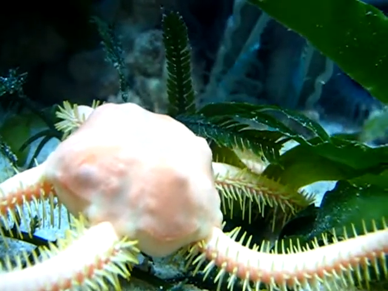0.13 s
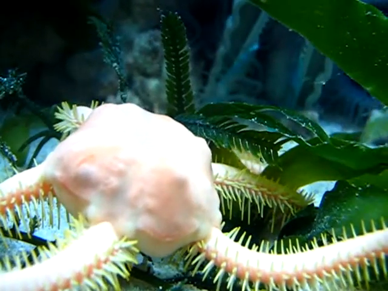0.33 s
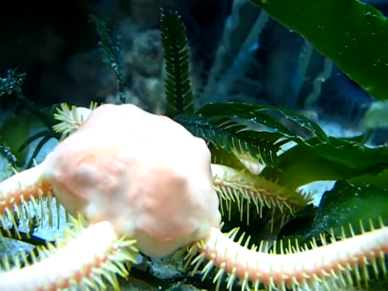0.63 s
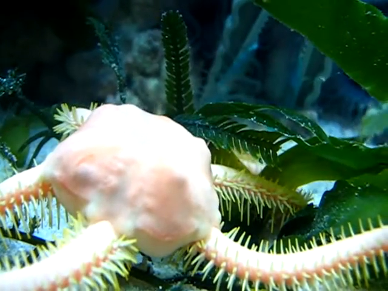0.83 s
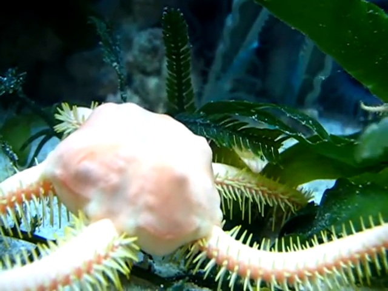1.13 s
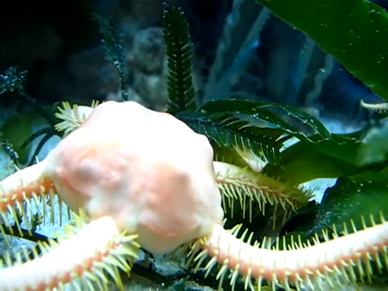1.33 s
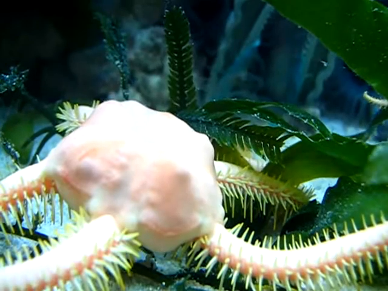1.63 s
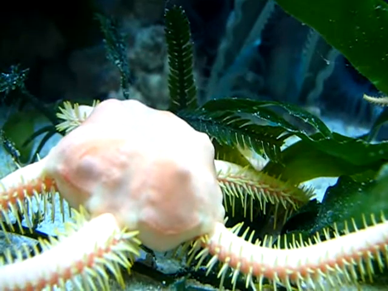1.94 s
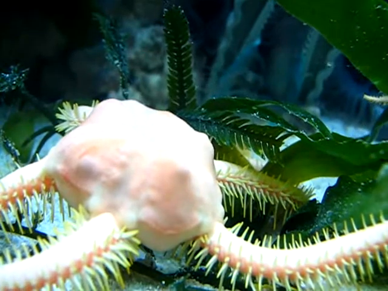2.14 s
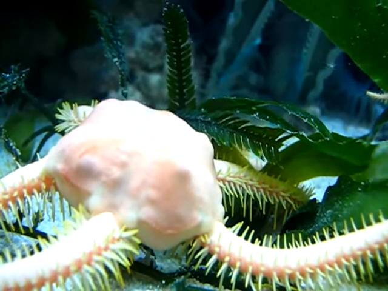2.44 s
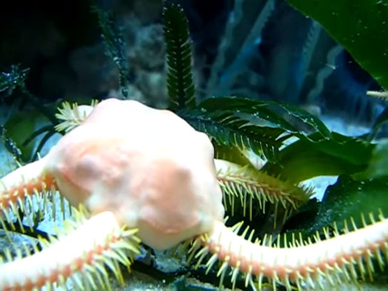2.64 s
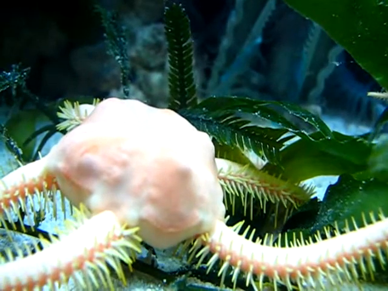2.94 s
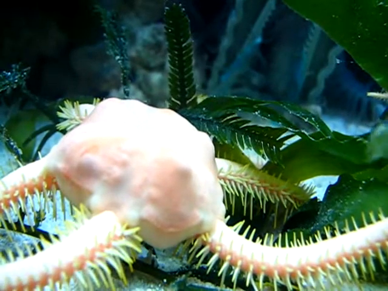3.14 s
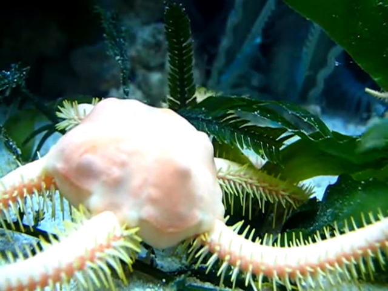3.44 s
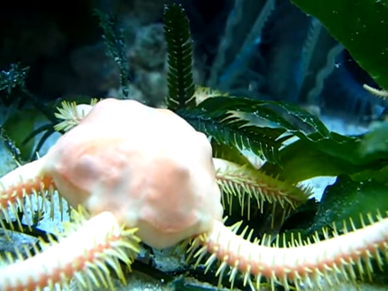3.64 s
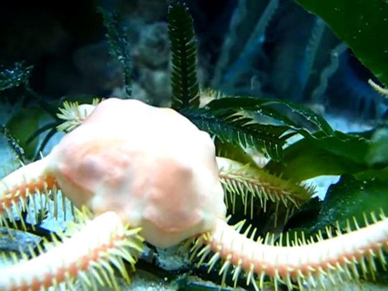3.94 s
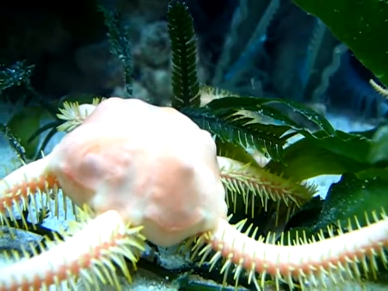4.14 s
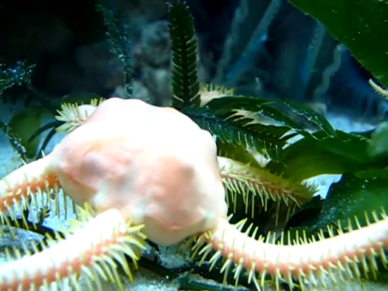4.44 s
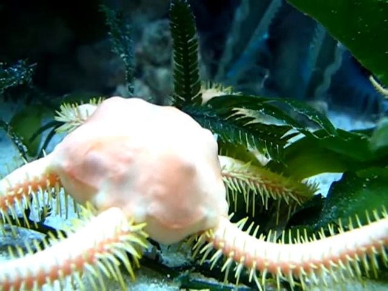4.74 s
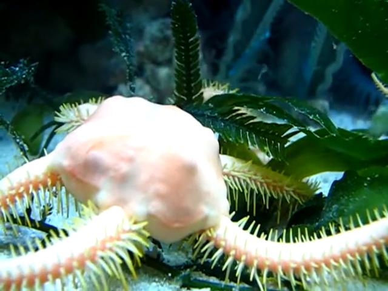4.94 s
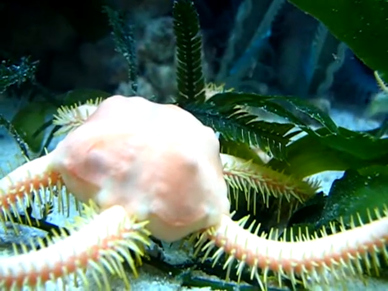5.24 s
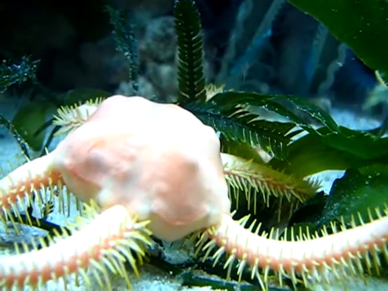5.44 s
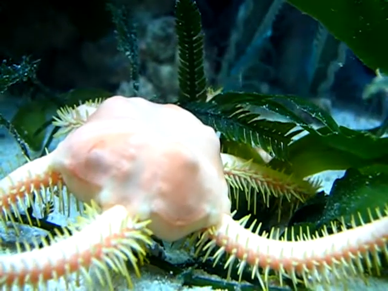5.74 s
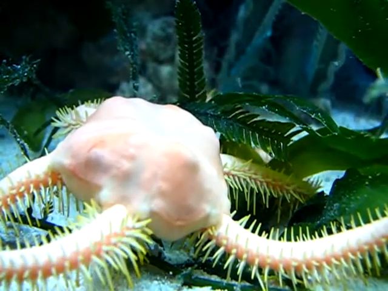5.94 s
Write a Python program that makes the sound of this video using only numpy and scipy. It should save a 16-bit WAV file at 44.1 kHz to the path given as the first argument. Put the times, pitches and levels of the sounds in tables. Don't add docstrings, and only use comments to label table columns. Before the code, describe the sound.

A steady low pump hum with a strong tone around 200 Hz fills a small indoor room beside an aquarium. Soft water rush and early gurgles lie beneath thin, constant high whines. A click with a thump comes near one second, small bubble pops and splashes follow, then handling bumps cluster after four seconds. A split-second buzz ends it in silence. Close compact stereo microphone, bumps mostly left.

```python
import sys
import numpy as np
from scipy import signal
from scipy.fft import rfft, irfft, next_fast_len
from scipy.io import wavfile
from scipy.ndimage import uniform_filter1d

SR = 44100
rng = np.random.default_rng(int(sys.argv[2]) if len(sys.argv) > 2 else 0)


def elevation(decibels):
    levels = np.asarray(decibels, float)
    return 10 ** (levels / 20)


def wav_out(sig):
    wavfile.write(sys.argv[1], SR, np.round(np.clip(np.atleast_2d(sig).T, -1, 1) * 32767).astype(np.int16))


N = 268112
T = np.arange(N) / SR


def unit(x):
    return x / np.sqrt(np.mean(x ** 2))


def gains(left_db, right_db, change_db=0):
    return elevation(np.array([[left_db], [right_db]]) + change_db)


def curve(table):
    s, *columns = np.transpose(table)
    return [np.interp(T, s, c) for c in columns]


def walk(rate_hz):
    hold = int(SR / rate_hz)
    steps = np.repeat(rng.standard_normal(N // hold + 1), hold)
    return 1.3 * uniform_filter1d(uniform_filter1d(steps, hold), hold)[:N]


def bell(s, half_s):
    return np.exp(-((T - s) / half_s) ** 2)


def band(hz, width_hz, size=N):
    b, a = signal.iirpeak(hz, hz / width_hz, fs=SR)
    once = signal.lfilter(b, a, rng.standard_normal(size))
    return unit(signal.lfilter(b, a, once))


def ring(hz, t60_ms, glide=0., rise_ms=.3):
    ms = np.arange(int(t60_ms * SR / 1000)) * 1000 / SR
    phase = 2 * np.pi * hz * (ms + 2 * glide * ms ** 2 / t60_ms) / 1000
    shape = 1000 ** (-ms / t60_ms) * (1 - np.exp(-ms / rise_ms))
    return np.sin(phase) * shape / shape.max()


def add(out, s, x, left_db, right_db):
    i = int(s * SR)
    out[:, i:i + len(x)] += gains(left_db, right_db) * x[:N - i]


# multiple of mains (rounded in use), left level in dB, right level in dB.
HUM_LINES = [(0.992, -41, -42.5), (1.997, -41.5, -48.5), (2.99, -50, -50.5), (4, -27, -29),
             (5.01, -37, -40), (6.05, -52.5, -54.5), (6.94, -56.5, -60.5), (8.04, -55, -56.5),
             (10.06, -55.5, -63), (11.06, -60, -66), (18.05, -66, -62), (27.02, -63, -72),
             (28.16, -65, -71), (39, -87, -76.5), (43, -76, -71), (45, -81, -89), (61.4, -68.5, -80),
             (68, -79, -71.5)]
# frequency in Hz, left level in dB, right level in dB.
RATTLE_SPECTRUM = [(600, -77.5, -88), (2000, -75.5, -86.5), (3480, -76.5, -89), (5000, -84.5, -88.5),
                   (7500, -82, -73.5), (8530, -93, -93)]


def pumps():
    mains_hz, start_rad, step_rad = 50.003, -2.1, 4.15
    cabinet_lead_rad, second_lag_rad = 1.45, 0.21
    turn = 2 * np.pi * mains_hz * T + step_rad
    out = np.zeros((2, N))
    for multiple, left_db, right_db in HUM_LINES:
        k = round(multiple)
        lead = cabinet_lead_rad * np.clip(3 - 2 * abs(k - 4.75), 0, 1) * (k > 3)
        lag = np.array([[0], [second_lag_rad * (k == 2)]])
        out += gains(left_db, right_db, 0.21 * walk(3.4)) * np.cos(k * turn + start_rad + lead - lag)

    hz, left_db, right_db = np.transpose(RATTLE_SPECTRUM)
    cycle = np.linspace(0, 2 * np.pi, num=2048, endpoint=False)
    orders = np.arange(12, 170)[:, None]
    scatter_db = 4.0 * rng.standard_normal(orders.shape)
    phase = rng.uniform(0, 2 * np.pi, orders.shape)
    for side, db in enumerate((left_db, right_db)):
        level = elevation(np.interp(orders * mains_hz, hz, db) + scatter_db)
        shape = (level * np.cos(orders * cycle + phase)).sum(axis=0)
        out[side] += np.interp(turn, cycle, shape, period=2 * np.pi)
    return np.sqrt(2) * out


# frequency in Hz, left and right density in dB per Hz, likeness 0-1.
RUSH_SPECTRUM = [(20, -83.5, -86.5, .5), (45, -65, -69, .8), (75, -68, -81.5, .6), (125, -63.5, -68.5, 1),
                 (230, -61.5, -63, 0.94), (278.8, -70, -75, 1), (456, -75.5, -77, 0.7),
                 (684, -75, -74, 0.3), (1040, -78.5, -81, 0.7), (1240, -85.5, -83.5, 0.6),
                 (2000, -85, -86.5, 0.22), (4000, -86, -88, 0.05), (5450, -89, -88.5, .05),
                 (7000, -87.5, -90, 0), (8950, -90.5, -89.5, 0.27), (10900, -94.5, -96.5, 0.02)]
# frequency in Hz, width in Hz, left and right density in dB per Hz.
RESONANCES = [(156.8, 34, -62.5, -60), (203.4, 26.6, -55, -57), (346, 35, -67.5, -73),
              (610, 60, -71, -78.5), (781, 15, -66.5, -71), (819, 32, -69, -73), (1434, 220, -81, -85),
              (4293, 370, -86, -97.5), (7860, 1200, -90, -81)]
# centre in seconds, level above calm in dB.
FLOW_SURGES = [(0, 4.5), (.33, 6), (.49, 8.5), (.84, 3), (1.1, 2.5), (2.3, 2), (2.73, 4), (4.17, 4.5),
               (4.33, 4), (4.52, 4), (4.7, 10.5), (4.86, 4), (5.19, 13)]


def water():
    size = next_fast_len(N)
    f = np.maximum(np.arange(size // 2 + 1) * SR / size, 1)
    hz, left_db, right_db, like = np.transpose(RUSH_SPECTRUM)
    power = np.array([elevation(np.interp(np.log(f), np.log(hz), db)) ** 2 for db in (left_db, right_db)])
    for centre_hz, width_hz, l_db, r_db in RESONANCES:
        power += gains(l_db, r_db) ** 2 / (1 + (2 * (f - centre_hz) / width_hz) ** 2) ** 2
    like = np.clip(np.interp(np.log(f), np.log(hz), like), 0, 1)
    mid, side = rfft(rng.standard_normal((2, size)))
    both = mid * np.sqrt(1 + like) + side * np.sqrt(1 - like) * np.array([[1], [-1]])
    both = both * np.sqrt(power * SR / 4)

    surge_s, calm_db, middle_share = .05, -2.5, 0.13
    boom_db = sum(db * bell(s, surge_s) for s, db in FLOW_SURGES) + calm_db
    middle_db = middle_share * boom_db + 2 * bell(4.6, 0.69)
    place = np.clip(2 * np.log2(f / 20), 0, 19)
    swell, out = walk(2), 0
    for k in range(20):
        own_db = boom_db * (k == 6) + middle_db * (9 <= k <= 11)
        share = np.clip(1 - abs(place - k), 0, 1)
        flicker_db = .3 * swell + .5 * walk(2.5) + .8 * walk(15)
        out = out + irfft(both * share, size)[:, :N] * elevation(own_db + flicker_db)
    return out


# centre in seconds, peak in dB, half length in seconds.
GULPS = [(.015, -48, .03), (.11, -52, .05), (.23, -47, .04), (.29, -51, .03), (.39, -54, .03),
         (.47, -45, .045), (.58, -50, .025)]
# start in seconds, peak in dB, frequency in Hz, width in Hz.
SPLASH_EVENTS = [
    (1.17, -58, 6500, 2000),
    (1.62, -55.5, 6030, 2000),
    (2.14, -55, 6200, 1500),
    (3.15, -51, 2960, 2500),
    (3.22, -52, 6500, 2000),
    (3.58, -50, 1750, 400),
    (4.71, -58, 4000, 300),
]
# start in seconds, peak in dB, frequency in Hz, t60 in ms, left minus right in dB.
BUBBLE_POPS = [(1.9815, -39, 2620, 22, 3), (1.9895, -46, 2500, 12, 3), (2.2543, -46.5, 2620, 14, 2),
               (2.3301, -49, 2600, 14, 2), (2.6694, -48, 2600, 12, 2), (3.038, -47, 3300, 12, 4),
               (2.905, -44, 880, 26, 14), (4.683, -47, 3800, 80, 4), (4.692, -48, 4150, 30, 4)]


def surface():
    shared = band(1560, 450)
    bright = elevation(-5 - 14 * np.minimum(T, 1))
    gate = sum(elevation(db) * bell(s, half_s) for s, db, half_s in GULPS)
    sides = []
    for side_db in (1.5, -1):
        body = .8 * shared + .6 * band(1560, 450)
        treble = band(3300, 500) + .7 * band(2500, 900)
        sides.append(gate * (body + bright * treble) * elevation(side_db))
    out = np.array(sides)

    rise_ms, splash_t60_ms, glide_per_ms = 13, 160, .0015
    ms = np.arange(int(splash_t60_ms * SR / 1000)) * 1000 / SR
    shape = (1 - np.exp(-(ms / rise_ms) ** 2)) * 1000 ** (-ms / splash_t60_ms)
    for s, db, hz, width_hz in SPLASH_EVENTS:
        splash = band(hz, width_hz, size=len(ms)) * shape / shape.max()
        add(out, s, splash, db + 2.5, db - 3.5)
    for s, db, hz, t60_ms, pan_db in BUBBLE_POPS:
        bubble = ring(hz, t60_ms, glide_per_ms * t60_ms, rise_ms=1)
        add(out, s, bubble, db + pan_db / 2, db - pan_db / 2)
    return out


# time in seconds, 7th multiple in Hz, level in dB.
MOTOR_SPEED = [
    (0.0, 4240, -64),
    (0.12, 4249, -65),
    (0.62, 4252, -64.5),
    (0.83, 4253, -58.5),
    (3.02, 4260, -60),
    (5.45, 4263, -59),
]
# shaft multiple, left level in dB, right level in dB.
MOTOR_PARTIALS = [(4, -10.5, -10), (7, 4.5, -7), (8, -16, -6.5), (10, -16, -24.5), (11, -13, -22),
                  (12, -4, 2), (15, -10, -14)]


def motor():
    hz, db = curve(MOTOR_SPEED)
    turn = 2 * np.pi * np.cumsum(hz / 7 * (1 + .0003 * walk(12))) / SR
    out = 0
    for k, left_db, right_db in MOTOR_PARTIALS:
        out = out + gains(left_db, right_db, db + .6 * walk(14)) * np.cos(round(k) * turn)
    return np.sqrt(2) * out


# start in seconds, peak in dB.
SHELL_TICKS = [(1.2206, -33), (1.9895, -37.5), (2.2555, -41), (2.334, -46), (2.6694, -45), (4.336, -38),
               (4.6988, -34.5)]
# frequency in Hz, level in dB, t60 in ms.
SHELL_MODES = [(600, -2, 7), (1100, -2, 6), (1800, -6, 4), (2700, -1, 6), (3200, 0, 6), (3700, -4, 6)]
# start in seconds, peak in dB, frequency in Hz, t60 in ms.
THUMPS = [
    (.895, -38, 50.1, 80),
    (1.215, -25, 95, 36),
    (3.496, -31, 75, 74),
    (4.338, -27.5, 105, 56),
    (4.417, -27.5, 110, 50),
    (4.475, -28.5, 80, 90),
    (4.695, -23, 90, 45),
    (4.945, -32, 65, 70),
]


def fingers():
    out = np.zeros((2, N))
    for s, db in SHELL_TICKS:
        add(out, s, ring(1200, 2.5, rise_ms=.1), db, db - 11)
        for hz, mode_db, t60_ms in SHELL_MODES:
            add(out, s, ring(hz, t60_ms, rise_ms=.35), db + mode_db, db + mode_db - 11)
    for s, db, hz, t60_ms in THUMPS:
        add(out, s, ring(hz, t60_ms, rise_ms=3.4), db + 2, db - 18)
    return signal.sosfilt(signal.butter(2, 45, "high", fs=SR, output="sos"), out)


# frequency in Hz, left level in dB, right level in dB, flip in ms, right lag in rad.
READOUT_WHINES = [(7867.14, -52.5, -51, 1.6, 0), (8265.02, -68, -54, 3.5, 1.8)]
READOUT_TRIM_DB = [3, 3.8]
# time in seconds, frequency in Hz.
WHISTLE_PITCH = [(0, 8770), (.7, 8880), (1.5, 8860), (1.95, 8770), (2.55, 8880), (2.8, 8780), (3.4, 8760),
                 (3.6, 8910), (4.55, 8760), (5.45, 8750)]


def sensor():
    first_flip_s, frame_hz, whistle_db = .0070, 29.97, -56
    frames = (T - first_flip_s) * frame_hz
    flips = 1. - 2 * (np.floor(frames) % 2)
    out = 0
    for (hz, left_db, right_db, flip_ms, lag), trim_db in zip(READOUT_WHINES, READOUT_TRIM_DB):
        sign = uniform_filter1d(flips, int(flip_ms * SR / 1000))
        tone = np.cos(2 * np.pi * hz * T - np.array([[0], [lag]]))
        out = out + np.sqrt(2) * gains(left_db, right_db, trim_db) * sign * tone
    hz, = curve(WHISTLE_PITCH)
    turn = 2 * np.pi * np.cumsum(hz + 22 * walk(9)) / SR - np.array([[0], [2.2]])
    whistle = np.cos(turn) * walk(170) + np.sin(turn) * walk(170)
    return out + unit(whistle) * gains(-5.0, 1.5, whistle_db + 0.96 * walk(12))


def scene():
    return pumps() + water() + surface() + motor() + fingers() + sensor()


def roll_off(x):
    return signal.sosfilt(signal.butter(12, 16000, fs=SR, output="sos"), x)


def record(dry):
    block, spikes_from, stuck_from, stop = 32, 240888, 240984, 241319
    level, sag, spike = np.array([[-.113], [-.068]]), np.array([[-.035], [-.02]]), -.058
    n = np.arange(N) - stuck_from
    ripple = (dry - uniform_filter1d(dry, 12))[:, stuck_from - block:stuck_from]
    stuck = ripple[:, n % block] + level + sag * np.exp(-np.maximum(n, 0) / 60)
    share = np.clip(1 + n / (3 * block), 0, 1) ** 2
    x = dry + share * (stuck - dry)
    bad_samples = (n % block == 0) & (n >= spikes_from - stuck_from)
    x += spike * np.convolve(bad_samples, [.5, 1, .5], "same")
    x = signal.sosfiltfilt(signal.ellip(10, .1, 50, 11000, fs=SR, output="sos"), x)
    x[:, stop:] = 0
    x[:, :8] *= np.linspace(.4, 1, num=8)
    return roll_off(x)


dry = scene()
out = record(dry)
wav_out(out)
```